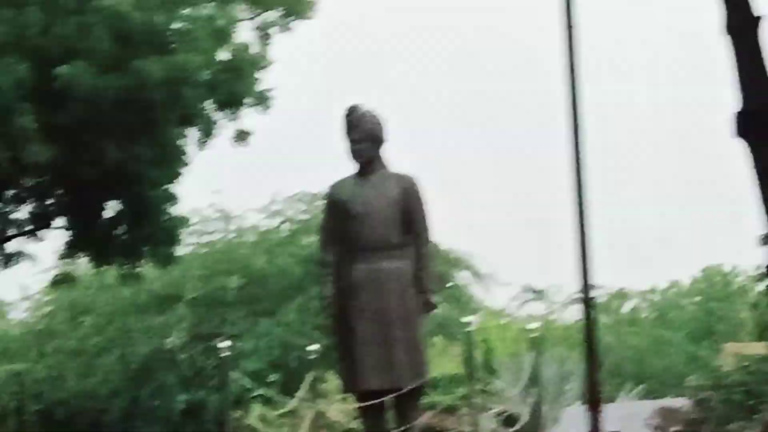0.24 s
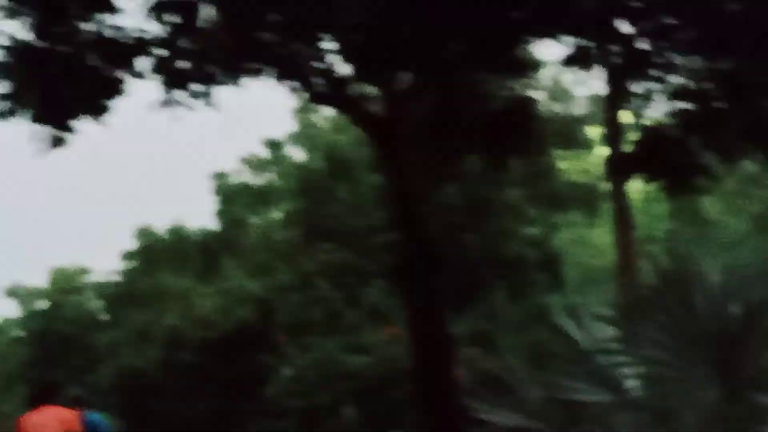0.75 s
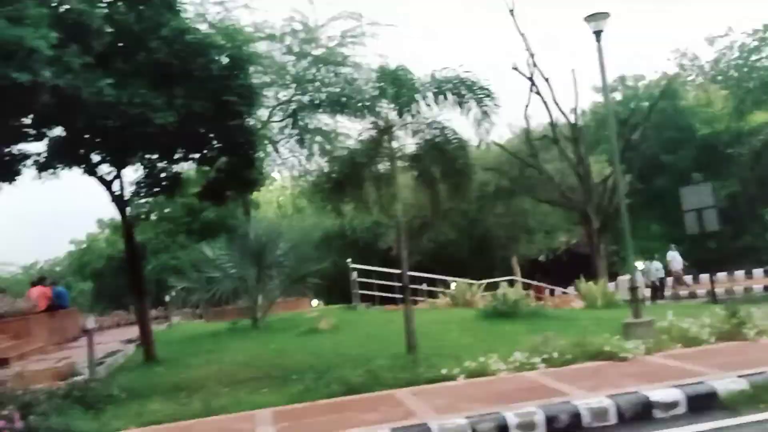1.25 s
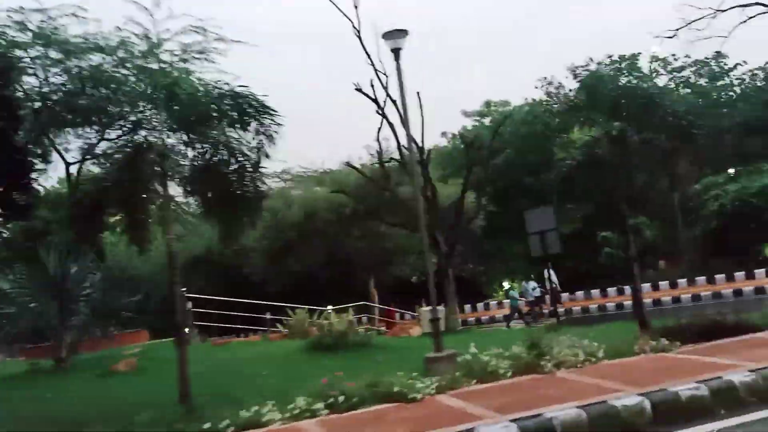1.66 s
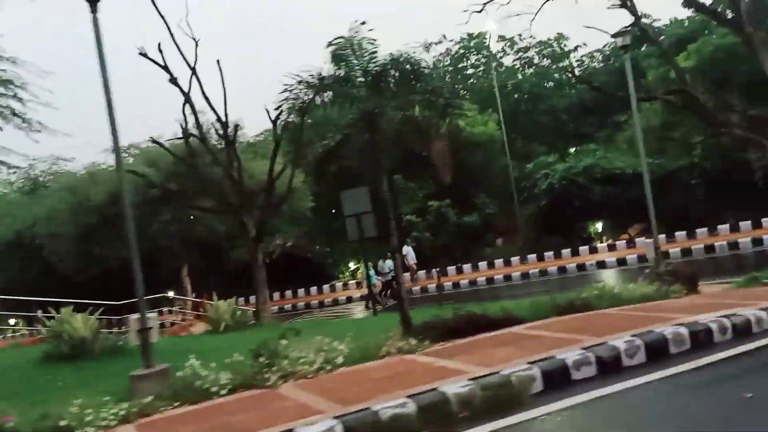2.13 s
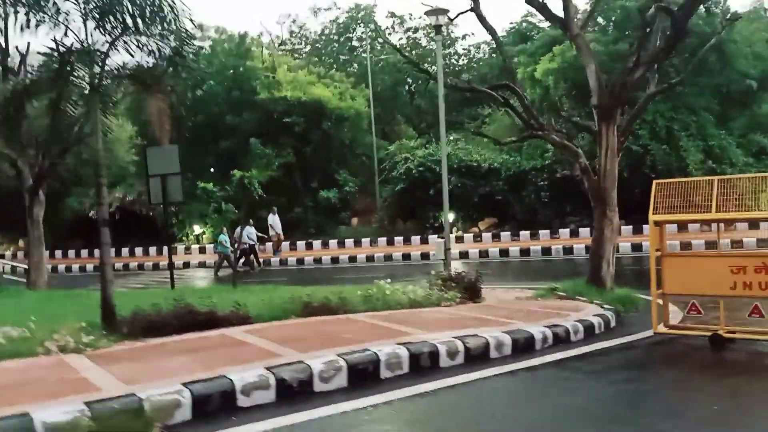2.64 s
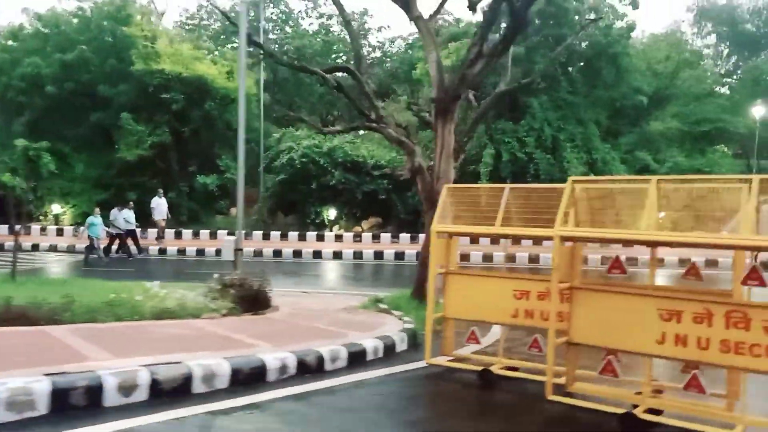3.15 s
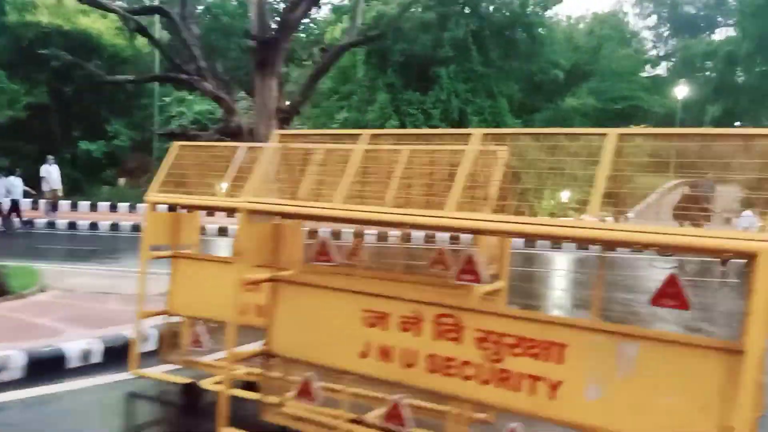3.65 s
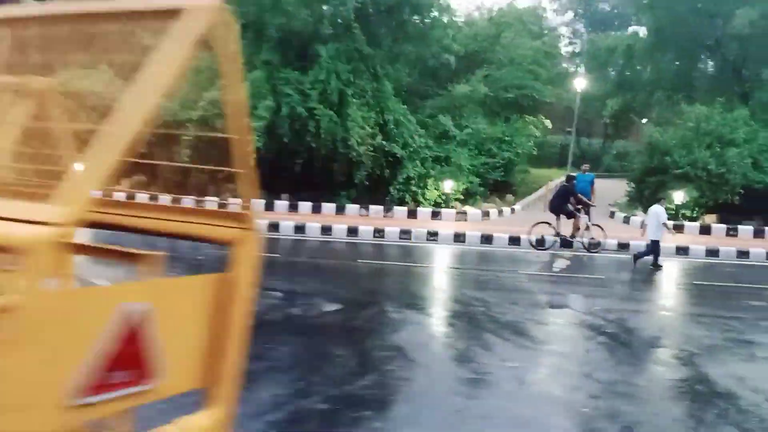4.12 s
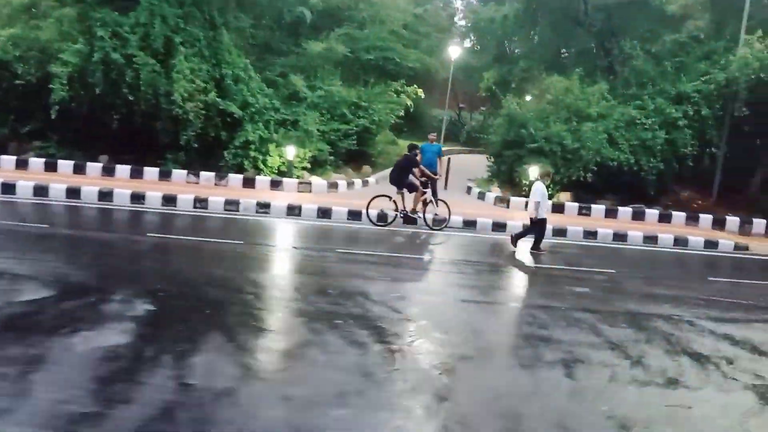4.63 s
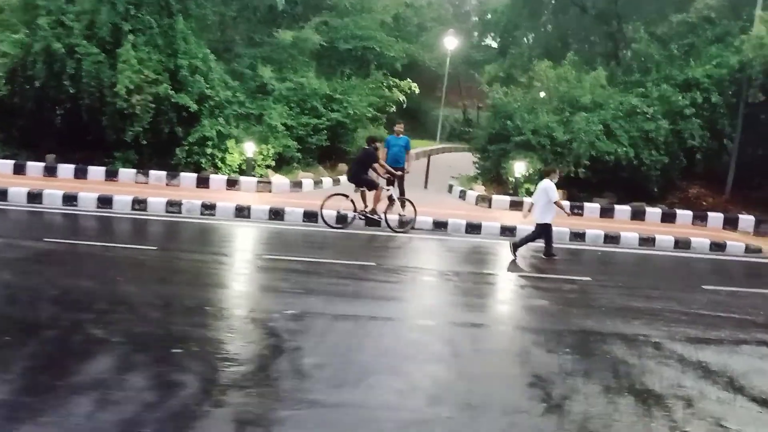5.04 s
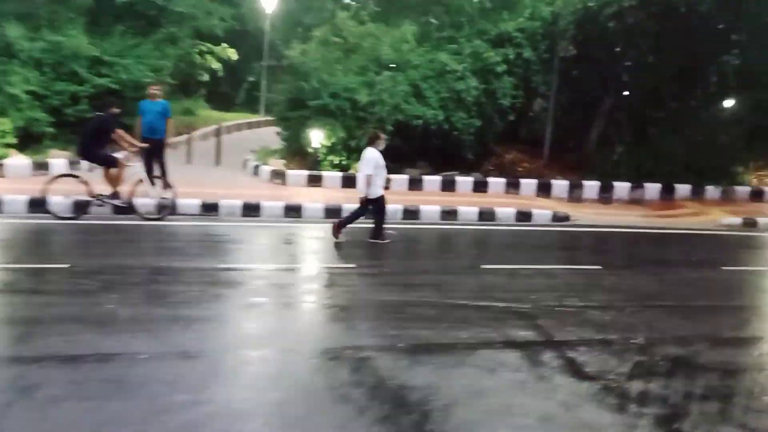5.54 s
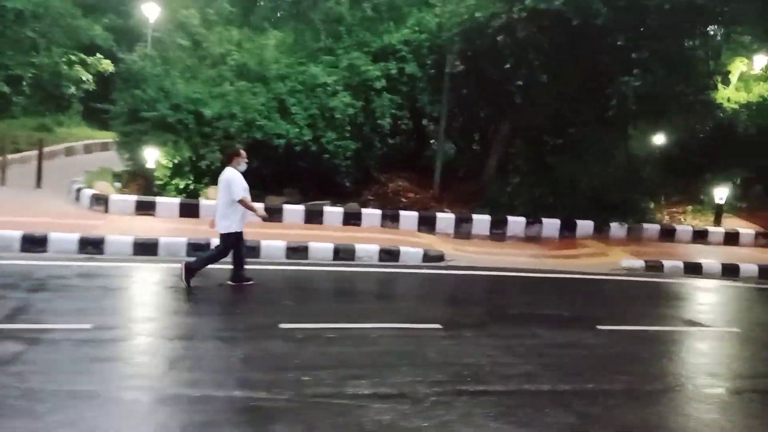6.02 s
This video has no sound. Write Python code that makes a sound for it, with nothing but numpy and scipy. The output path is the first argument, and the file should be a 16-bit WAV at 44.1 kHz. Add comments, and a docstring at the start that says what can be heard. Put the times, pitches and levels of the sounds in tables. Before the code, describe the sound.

Wind buffets the microphone, thumping first on the left, then tearing hard on the right, over a vehicle rolling along a wet park road.

```python
"""Wind buffets two microphone ports separately: first the left, then it tears hard at the right.
Each port hears lumpy noise in four eddy sizes, plus slaps, pops, rips and hollow howls.
Below it, a ride on a wet park road: filtered noise rolls and hisses, resonances and unsteady tones drone.
Early on, a far bird wails twice and a faint whistle slides down twice, with echoes; later one small tick."""
import sys
import numpy as np
from scipy import signal
from scipy.fft import rfft, irfft, next_fast_len
from scipy.io import wavfile
from scipy.ndimage import uniform_filter1d, map_coordinates

SR = 44100
rng = np.random.default_rng(int(sys.argv[2]) if len(sys.argv) > 2 else 0)


def digitize_waveform(pressure):
    """Quantize a signal to 16-bit integers and store it at the path in sys.argv[1].

    Rows of a 2-D input are taken as channels; values are limited to [-1, 1].
    """
    field = np.atleast_2d(pressure).T
    bounded = np.clip(field, -1, 1)
    quanta = np.round(bounded * 32767).astype(np.int16)
    wavfile.write(sys.argv[1], SR, quanta)


N = 276948

# Airflow at each port: time_s, flow_db, tearing_re_flow_db
FLOW_LEFT = [(0, -58.5, -22), (1.2, -50, -21), (1.9, -35.5, -18), (2.4, -41.5, -15), (2.48, -30, -12.5),
             (3.3, -26, -24), (4.04, -25.5, -15.5), (4.22, -38.5, -30), (4.52, -37, -13),
             (4.62, -41.5, -16), (4.92, -41.5, -12), (5.1, -32.5, -13), (5.42, -35, -7), (5.72, -36, -7),
             (6.0, -39, -4.5), (6.28, -42, -7)]
FLOW_RIGHT = [(0, -58, -14), (.25, -37.5, -30.5), (1.0, -47.5, -16), (1.35, -36, -18), (2.1, -42.5, -23),
              (2.65, -53.5, -17), (2.9, -31, -24.5), (3.25, -29.5, -26), (3.72, -19.5, -13.5),
              (3.96, -16, -6.5), (4.26, -20.5, -9), (4.44, -21.5, -2.5), (4.6, -27, -4), (4.78, -24, -5.5),
              (5.3, -25, -1), (5.7, -26, 2.5), (5.88, -19, -4.5), (6.28, -25.5, -3)]
# Brief changes of the right flow, nearly all dips: centre_s, half_length_s, change_db
FLOW_LULLS = [(3.431, 0.018, -7), (3.555, .014, -4.5), (3.758, 0.013, -1.5), (3.794, .007, -2),
              (3.84, 0.0076, -1), (3.903, 0.0067, -1.5), (4.08, .01, -5.5), (4.266, 0.017, -5),
              (4.461, 0.0081, -1.5), (4.543, .01, -2.5), (4.604, 0.018, -8), (4.673, 0.01, -1),
              (4.747, 0.011, 2.5), (4.924, .01, -4), (4.982, 0.012, -9.5), (5.073, 0.015, -2),
              (5.313, 0.023, -5.5), (5.416, 0.016, -3), (5.552, 0.03, -4), (5.707, .009, -5),
              (5.92, .01, -3.5), (6.198, .012, -2.5)]
# Single slaps of wind: centre_s, port, half_length_s, level_db, tearing_re_slap_db
WIND_SLAPS = [(0.274, "left", 0.0073, -33.5, -21), (0.457, "left", 0.027, -35, -28),
              (1.975, "left", 0.019, -16, -21.5), (1.982, "right", 0.024, -27, -27),
              (2.033, "left", 0.09, -23.5, -29), (2.121, "left", 0.014, -19, -15),
              (2.173, "left", 0.008, -11.5, -22), (2.303, "left", 0.022, -36, -7),
              (2.914, "right", .02, -30.5, -25), (3.068, "right", 0.028, -29, -15),
              (3.175, "right", 0.0087, -33.5, -4), (3.363, "right", 0.028, -26, -23),
              (3.396, "right", 0.012, -21, -18), (3.515, "right", 0.017, -29.5, -21),
              (3.663, "right", .025, -19.5, -26), (3.725, "right", 0.013, -19, -23),
              (3.769, "right", .009, -18, -22), (3.813, "right", 0.01, -18.5, -18),
              (3.998, "right", 0.019, -24.5, -13), (4.137, "right", 0.028, -19.5, -19),
              (4.183, "right", 0.0099, -22.5, -26), (4.258, "right", 0.019, -32.5, 9),
              (4.348, "right", 0.024, -24.5, 0.5), (4.446, "right", 0.0084, -28.5, 6.5),
              (4.571, "right", 0.0099, -30.5, -2), (4.633, "right", 0.011, -33, 5.5),
              (4.77, "right", 0.014, -25.5, -7), (4.895, "right", 0.0097, -26.5, -6),
              (5.001, "right", 0.02, -29.5, 4.5), (5.14, "right", 0.015, -28, 2),
              (5.267, "right", 0.039, -26, 0.5), (5.376, "right", 0.015, -33.5, 2.5),
              (5.464, "right", 0.046, -28, -1), (5.459, "left", 0.022, -28, -14),
              (5.587, "left", 0.004, -23.5, -6), (5.66, "right", 0.037, -23.5, -6.5),
              (5.858, "right", .02, -27, -8), (6.255, "right", 0.022, -34, 6)]
# Eddy spectra, big to small, then the body of a slap: freq_hz, density_db
BUFFET_SPECTRUM = [(20, -40.5), (35, -29), (60, -7.5), (90, -2.5), (140, 0.5), (220, -3), (330, -8.5),
                   (500, -14.5), (900, -52), (2000, -100)]
FLUTTER_SPECTRUM = [(60, -34), (150, -3), (240, 1.5), (340, 1), (500, -3), (700, -9), (1000, -25.5),
                    (1600, -40), (4000, -91)]
TEARING_SPECTRUM = [(150, -38.5), (450, 2.5), (800, 4), (1050, 0), (1500, -13.5), (2400, -32.5),
                    (4300, -49), (8000, -67)]
RIPPING_SPECTRUM = [(600, -22), (1100, 10.5), (1500, 5), (2400, -1), (3200, -12), (4300, -26.5),
                    (6200, -32), (8000, -52), (12000, -67.5)]
THUMP_SPECTRUM = [(50, -24), (105, 2), (170, -3), (245, 1), (310, -8), (450, -31), (900, -71.5)]
LUMP_CEILING_DB = 7.5  # no eddy is much stronger than the flow that carries it
RIP_GROWTH_DB_PER_DB, RIP_FROM_DB = 0.45, -30  # extra ripping above this tearing level
# Loudest vortices crossing a port: centre_s, port, half_length_s, peak_db
VORTEX_POPS = [(1.958, "left", 0.00051, -14.5), (2.1195, "left", 0.00046, -14.5),
               (2.174, "left", .00055, -14), (2.2915, "left", 0.0003, -22), (2.3, "left", 0.00024, -22.5),
               (2.313, "left", 0.00021, -18.5), (2.322, "left", .00018, -26), (2.329, "left", 0.00022, -18),
               (2.6717, "left", 0.00035, -18.5), (3.11, "left", 0.00025, -28),
               (3.3048, "left", 0.00046, -9.5), (3.317, "left", 0.0003, -23),
               (3.399, "right", 0.00038, -19), (3.4676, "left", 0.00036, -18),
               (3.615, "right", 0.00034, -19), (3.643, "left", 0.00017, -26),
               (3.809, "right", 0.00052, -14), (4.084, "right", 0.00039, -8.5),
               (4.204, "right", 0.0005, -8), (4.402, "right", 0.00024, -8.5),
               (4.52, "right", 0.0003, -13.5), (4.686, "right", 0.00039, -22),
               (4.831, "right", 0.00027, -16.5), (4.927, "right", 0.00062, -17),
               (5.1048, "right", 0.00049, -14.5), (5.183, "right", 0.00021, -14),
               (5.576, "left", 0.00047, -17), (5.584, "left", 0.00034, -14),
               (5.6164, "right", 0.00029, -10), (5.718, "right", 0.00032, -10.5),
               (5.78, "right", 0.00046, -12.5), (5.821, "right", .0003, -14.5),
               (5.885, "right", 0.00041, -15), (5.935, "right", .00042, -11.5),
               (5.99, "right", 0.00028, -10.5), (6.2, "right", 0.00034, -18)]
SLAP_FAR_PORT_DB, POP_FAR_PORT_DB = -28, -23.5  # share felt by the other port
# Flow breaking away from the right port: centre_s, half_length_s, level_db
BRIGHT_RIPS = [(4.262, 0.0055, -37), (4.448, .008, -32), (4.989, 0.0027, -34.5), (5.134, .016, -40),
               (5.186, .008, -34.5), (5.218, .007, -30.5), (5.261, 0.004, -27), (5.281, .004, -30.5),
               (5.295, .004, -33), (5.371, .008, -33), (5.488, .03, -44), (5.643, .02, -38)]
# Spectrum of those rips: freq_hz, density_db
BRIGHT_RIP_SPECTRUM = [(800, -27), (1500, 5), (2400, -5.5), (3300, -11.5), (4300, -27), (6200, -28),
                       (8000, -52.5)]
# Gusts that make the right port howl: start_s, centre_hz, level_db, fade_db_per_s
HOWL_GUSTS = [(3.849, 820, -12, 284), (3.927, 840, -21, 72), (4.54, 1000, -28, 202), (4.625, 820, -27, 332),
              (4.809, 970, -27.5, 702), (5.178, 965, -19.5, 480), (5.238, 516, -28, 330),
              (5.715, 603, -24, 600), (5.93, 420, -23.5, 328), (5.987, 784, -26, 700)]
# Howl spectrum: multiple_of_centre, density_db
HOWL_SPECTRUM = [(.375, -45.5), (.8, -5), (1, 2), (1.19, -5), (1.44, -14), (2, -35.5), (3.75, -85)]
HOWL_ATTACK_S = 0.0071

# Vehicle levels: time_s, roll_db, spray_and_song_db, drone_and_hum_db
RIDE_LEVELS = [(0, -37.5, -59, -50.5), (.9, -36, -62, -51.5), (1.7, -36, -60.5, -47.5),
               (2.1, -38.5, -50, -48.5), (2.8, -38, -51, -50), (3.8, -36, -49.5, -52),
               (4.2, -38.5, -52, -58), (4.6, -45.5, -58.5, -63), (5.3, -48, -59.5, -54),
               (6.28, -49, -64.5, -63)]
# Rolling noise: freq_hz, density_db
ROLL_SPECTRUM = [(20, -28), (45, -9), (110, 6), (215, -5), (350, -3.5), (440, -9.5), (850, -16.5),
                 (1100, -12), (1400, -16.5), (2350, -12.5), (3100, -23), (3900, -34), (6100, -35),
                 (7900, -42.5), (9000, -69.5)]
# Rolling noise balance: freq_hz, left_re_right_db
ROLL_BALANCE = [(60, -0.5), (190, -7), (350, -1), (700, 7), (1200, -1.5), (2100, -4), (3000, -3),
                (4200, 2.5), (7500, 0.5)]
# Rolling noise correlation between channels: freq_hz, correlation
ROLL_CORRELATION = [(60, 0.084), (200, 0.76), (370, 1), (700, 0.98), (1250, 0.18), (2300, 0.27),
                    (4200, -0.31), (7700, -0.08)]
# Water thrown off the tyres: freq_hz, density_db
SPRAY_SPECTRUM = [(1000, -25), (2200, 6), (3000, 6.5), (3900, 0), (4600, -1), (5800, 1.5), (6250, 6.5),
                  (6700, -5), (7800, -17), (10500, -10.5), (15000, -20.5)]
# Tyre resonances on the wet stretch: centre_hz, half_width_hz, rms_db
TYRE_RESONANCES = [(1164, 23, -0.5), (1215, 34, 2), (2982, 26, -8.5), (3420, 24, -15)]
# Pitch drift of the tyre song: time_s, pitch_ratio
SONG_PITCH = [(2.1, 1), (2.7, 1.01), (3.3, .985), (3.8, 1.03)]
# Resonances kept ringing by the drive: centre_hz, half_width_hz, rms_db
DRIVE_RESONANCES = [(250, 25, -3.5), (339, 12, -7), (533, 24, -4.5), (582, 7.7, -6), (747, 14, -17),
                    (1040, 70, -3), (1250, 37, -12.5), (1645, 35, -6), (2434, 33, -11.5), (5240, 58, -27.5)]
# Steady tones of the drive: pitch_hz, level_re_drone_db, pitch_waver_ratio, left_re_right_db
DRIVE_TONES = [(346.3, 0.5, 0.0055, 0), (498, -7, 0.0055, 3.5), (718, -14.5, 0.0037, 2.5),
               (812, -13, .008, -5.5), (1222, -11.5, 0.003, -3), (1417, -16, .003, 5.5),
               (1680, -16, .003, -7), (1727, -21.5, 0.0033, 3), (2420, -15, .003, -5),
               (3416, -24, .002, 10)]

# Far calls: start_s, length_s, fall_s, first_pitch_hz, last_pitch_hz, level_db
BIRD_WAILS = [(0.063, 0.34, .25, 633, 594, -57), (0.398, .3, .15, 624, 571.4, -55)]
FALLING_WHISTLES = [(0.811, 0.19, 0.14, 965, 770, -54), (0.904, 0.19, 0.16, 1201, 1025, -60)]
# Resonances of the bird's throat: freq_hz, gain_db
THROAT_GAIN = [(600, 5), (1200, -16), (1850, -11), (2280, 1.5), (2400, 7), (2500, -1.5), (2950, -15),
               (3420, -1), (3560, -9), (3720, -5), (4200, -16), (4900, -10.5), (5200, -21), (5560, -12),
               (6200, -30)]
CALL_ATTACK_S, CALL_RELEASE_S, CALL_FADE_DB_PER_S = 0.045, .07, 12
DULLING_DB_PER_S, DULLING_FROM_HZ = 40, 4000  # extra fade of the highest partials
# One small sharp tick: start_s, level_db
SHARP_TICK = (2.6546, -40)
# Tick spectrum: freq_hz, density_db
TICK_SPECTRUM = [(1500, -29), (3500, -1), (6000, 0), (8000, -8), (15000, -13)]

SHELF_HZ, SHELF_DB = 8050, -20.5
SELF_NOISE_DB, TOP_HZ = -93, 15200


def amp(db):
    """Decibels to gain."""
    return 10 ** (np.asarray(db) / 20)


def unit(x):
    """Scale to rms 1."""
    return x / np.sqrt(np.mean(x ** 2) + 1e-20)


def along(points, hz):
    """Interpolate (freq_hz, value) points on a log axis."""
    f, v = np.transpose(points)
    return np.interp(np.log(hz + 1), np.log(f + 1), v)


def clock():
    """Time of every sample, in seconds."""
    return np.arange(N) / SR


def curves(rows):
    """One value per sample for each column after the time."""
    s, *cols = np.transpose(rows)
    return [np.interp(clock(), s, c) for c in cols]


def bell(centre_s, half_s):
    """Gaussian bump in time."""
    return np.exp(-np.minimum(((clock() - centre_s) / half_s) ** 2, 50))


def wobble(rate_hz):
    """Smooth random curve through rate_hz knots a second."""
    return map_coordinates(rng.standard_normal(8192), [clock() * rate_hz], mode="wrap")


def filtered(x, response):
    """Multiply the spectrum of x by a response of frequency."""
    m = next_fast_len(N + 8192)
    spectrum = rfft(x, m) * response(np.fft.rfftfreq(m, 1 / SR))
    return irfft(spectrum, m)[..., :N]


def coloured(x, spectrum):
    """Shape x by a (freq_hz, density_db) spectrum, at rms 1."""
    return unit(filtered(x, lambda hz: amp(along(spectrum, hz))))


def ringing(modes):
    """Stereo noise in narrow resonances whose powers add."""
    def response(hz):
        power = 0
        for centre_hz, half_width_hz, rms_db in modes:
            peak = unit(1 / (1 + ((hz - centre_hz) / half_width_hz) ** 2))
            power = power + amp(rms_db) ** 2 * peak ** 2
        return np.sqrt(power)
    return filtered(rng.standard_normal((2, N)), response)


def panned(x, left_db):
    """Lean a sound to the left by a level difference."""
    return x * amp(np.array([[left_db], [-left_db]]) / 2)


def sliding(x, ratio):
    """Scale the pitch of stereo x by reading it at a changing speed."""
    return np.array([map_coordinates(channel, [np.cumsum(ratio)], mode="mirror") for channel in x])


def wind():
    """Unrelated turbulence at the two ports, plus pops, rips and howls."""
    left = port(FLOW_LEFT, "left", buffet_db=0.0, flutter_db=-5.0, tear_db=0.5, rip_db=-14.5, thump_db=-7.0)
    right = port(FLOW_RIGHT, "right", buffet_db=-3.0, flutter_db=-4.5, tear_db=-1.6, rip_db=-12.0,
                 thump_db=-6.0)
    return np.array([left, right]) + pops() + rips() + howl()


def port(flow, side, buffet_db, flutter_db, tear_db, rip_db, thump_db):
    """Wind on one port: big eddies buffet, middling ones flutter, fast flow tears into short rips."""
    flow_db, edge_db = curves(flow)
    if side == "right":
        flow_db = flow_db + sum(db * bell(s, half_s) for s, half_s, db in FLOW_LULLS)
    slap_power, high_power = 0, amp(flow_db + edge_db) ** 2
    for s, hit, half_s, db, slap_edge_db in WIND_SLAPS:
        felt_db = db if hit == side else db + SLAP_FAR_PORT_DB
        power = amp(felt_db) ** 2 * bell(s, half_s)
        slap_power = slap_power + power
        high_power = high_power + power * amp(slap_edge_db) ** 2
    low_power = amp(flow_db) ** 2 + slap_power / 2  # half of a slap's power stirs the eddies

    lumps_db = 4.6 * wobble(55) + 3.4 * wobble(170)  # shared by all eddy sizes
    shreds_db = 1.5 * wobble(70) + 3.6 * wobble(450)  # bursts of the smallest eddies
    force_db = 10 * np.log10(low_power / low_power.mean())
    # stronger flow shifts power from big eddies to middling ones
    buffet_gain = amp(buffet_db - 0.33 * np.maximum(force_db, 0))
    buffet = buffet_gain * eddies(BUFFET_SPECTRUM, 0.69 * lumps_db)
    flutter_gain = amp(flutter_db + 0.19 * force_db)
    flutter = flutter_gain * eddies(FLUTTER_SPECTRUM, 0.51 * lumps_db + 3.3 * wobble(260))
    tearing = amp(tear_db) * eddies(TEARING_SPECTRUM, 0.56 * lumps_db + shreds_db + 2.0 * wobble(110))
    excess_db = np.maximum(10 * np.log10(high_power) - RIP_FROM_DB, 0)
    rip_gain = amp(rip_db + RIP_GROWTH_DB_PER_DB * excess_db + 2.0 * wobble(24))
    rip_lumps_db = 0.67 * lumps_db + 0.94 * shreds_db + 2.0 * wobble(240)
    ripping = rip_gain * eddies(RIPPING_SPECTRUM, rip_lumps_db)
    thump = amp(thump_db) * eddies(THUMP_SPECTRUM, lumps_db / 2)
    low = np.sqrt(low_power) * (buffet + flutter)
    high = np.sqrt(high_power) * (tearing + ripping)
    return low + high + np.sqrt(slap_power) * thump


def eddies(spectrum, lumps_db):
    """Turbulent pressure: noise in dense lumps, its smoothed strength held steady."""
    lumpy = rng.standard_normal(N) * amp(np.minimum(lumps_db, LUMP_CEILING_DB))
    pressure = coloured(lumpy, spectrum)
    power = uniform_filter1d(uniform_filter1d(pressure ** 2, size=1700), size=900)
    return pressure / np.sqrt(np.abs(power) + 1e-6)


def pops():
    """A vortex crossing a port pushes once and sucks once; short ones snap, long ones thud."""
    out = np.zeros((2, N))
    for s, hit, half_s, peak_db in VORTEX_POPS:
        u = np.clip((clock() - s) / half_s, -10, 10)
        reach = amp([[0 if side == hit else POP_FAR_PORT_DB] for side in ("left", "right")])
        out += amp(peak_db) * reach * -u * np.exp((1 - u * u) / 2)
    return out


def rips():
    """Short bright noise bursts as the flow breaks away from the right port."""
    level = sum(amp(db) * bell(s, half_s) for s, half_s, db in BRIGHT_RIPS)
    return np.outer([0, 1], level * eddies(BRIGHT_RIP_SPECTRUM, 3.5 * wobble(450)))


def howl():
    """Air blown hard across the right port: broad hollow notes that leap up and die away."""
    out, lumps_db = 0, 1.1 * wobble(120)
    for s, centre_hz, db, fade_db_per_s in HOWL_GUSTS:
        age_s = np.maximum(clock() - s, 0)
        fade = amp(np.maximum(db - fade_db_per_s * age_s, -200))
        level = np.minimum(age_s / HOWL_ATTACK_S, 1) * fade
        spectrum = [(centre_hz * multiple, density_db) for multiple, density_db in HOWL_SPECTRUM]
        out = out + level * eddies(spectrum, lumps_db)
    return np.outer([0, 1], out)


def vehicle():
    """Rolling roar, hissing spray with singing tyres, and the drone of the drive."""
    roll_db, spray_db, drone_db = curves(RIDE_LEVELS)
    bumps_db = 0.27 * wobble(6.8) + 0.94 * wobble(45)  # the grain of the asphalt
    spray_noise = rng.standard_normal((2, N)) * amp(2.4 * wobble(600))
    spray = panned(coloured(spray_noise, SPRAY_SPECTRUM), left_db=11.5) * amp(-4.0)
    song = sliding(ringing(TYRE_RESONANCES), curves(SONG_PITCH)[0]) * amp(0.75 * wobble(10.0))
    drone = panned(ringing(DRIVE_RESONANCES), left_db=-3.0)
    return amp(roll_db + bumps_db) * rolling() + amp(spray_db) * (spray + song) + amp(drone_db) * drone


def rolling():
    """Rolling noise: mid and side shares set the channel correlation at each frequency."""
    def mid_side(hz):
        angle = np.arccos(np.clip(along(ROLL_CORRELATION, hz), -1, 1)) / 2
        return amp(along(ROLL_SPECTRUM, hz)) * [np.cos(angle), np.sin(angle)]

    def balance(hz):
        return amp(np.outer([.5, -.5], along(ROLL_BALANCE, hz)))
    mid, side = filtered(rng.standard_normal((2, N)), mid_side)
    return unit(filtered(np.array([mid + side, mid - side]), balance))


def hum():
    """Slightly unsteady tones that swell and fade with the drone."""
    _, _, drone_db = curves(RIDE_LEVELS)
    out = 0
    for pitch_hz, db, waver, left_db in DRIVE_TONES:
        phase = 2 * np.pi * np.cumsum(pitch_hz * (1 + waver * wobble(25))) / SR
        level = np.sqrt(2) * amp(drone_db + db + 2.5 * wobble(9))
        out = out + panned(level * np.sin(phase), left_db)
    return out


def birds(t60_s=0.28, echo_db=-7):
    """Far calls, scattered by the trees on their way to each port."""
    wails = sum(call(row, THROAT_GAIN, waver=0.00344, count=9) for row in BIRD_WAILS)
    whistles = sum(call(row, [(1000, 0.0047)], waver=0.0066, count=1) for row in FALLING_WHISTLES)
    direct = wails + whistles
    t = clock()[:SR // 2]
    trees = rng.standard_normal((2, len(t))) * amp(-60 * t / t60_s)
    echo = signal.fftconvolve(direct[None], trees / np.linalg.norm(trees[0]), axes=1)[:, :N]
    return direct + amp(echo_db) * echo


def call(row, throat, waver, count):
    """A note that swells and slides down; flickering partials pass through the throat and the highest dull."""
    s, length_s, fall_s, first_hz, last_hz, db = row
    age_s = np.clip(clock() - s, 0, length_s)
    fallen = np.sin(np.pi / 2 * np.minimum(age_s / fall_s, 1)) ** 2
    pitch_hz = first_hz + (last_hz - first_hz) * fallen
    phase = 2 * np.pi * np.cumsum(pitch_hz * (1 + waver * wobble(90))) / SR
    swell = np.minimum(age_s / CALL_ATTACK_S, 1) * np.minimum((length_s - age_s) / CALL_RELEASE_S, 1)
    tone = 0
    for k in range(1, count + 1):
        dulling_db = DULLING_DB_PER_S * age_s * (k * first_hz > DULLING_FROM_HZ)
        partial_db = along(throat, k * pitch_hz) - dulling_db + 1.6 * wobble(45)
        tone = tone + amp(partial_db) * np.sin(k * phase)
    return np.sqrt(2) * swell * amp(db - CALL_FADE_DB_PER_S * age_s) * tone


def tick():
    """A tiny bright noise click that decays 60 dB in 20 ms."""
    s, db = SHARP_TICK
    age_s = clock() - s
    fade = amp(db - 60 * np.abs(age_s) / .02)
    return (age_s > 0) * fade * coloured(rng.standard_normal((2, N)), TICK_SPECTRUM)


def scene():
    """Everything that reaches the two ports."""
    return wind() + vehicle() + hum() + birds() + tick()


def record(dry):
    """Fade the ends, cut the top treble with a steep shelf, add faint hiss, limit the band."""
    def shelf(hz):
        return amp(SHELF_DB) + (1 - amp(SHELF_DB)) / (1 + (hz / SHELF_HZ) ** 70)
    dulled = filtered(dry * signal.windows.tukey(N, .001), shelf)
    hiss = amp(SELF_NOISE_DB) * rng.standard_normal((2, N))
    return filtered(dulled + hiss, lambda hz: hz < TOP_HZ)


dry = scene()
out = record(dry)
digitize_waveform(out)
```